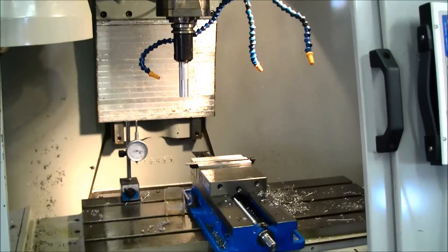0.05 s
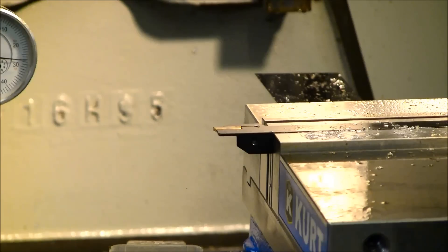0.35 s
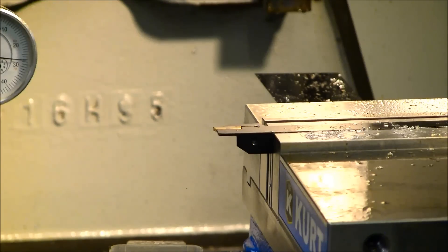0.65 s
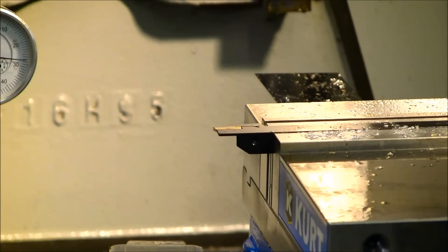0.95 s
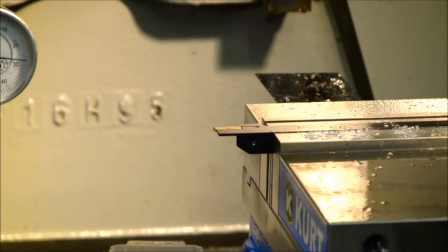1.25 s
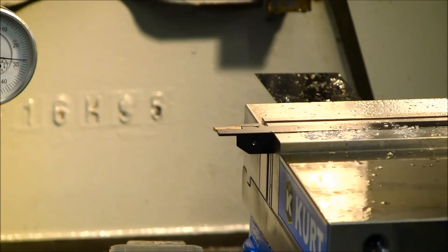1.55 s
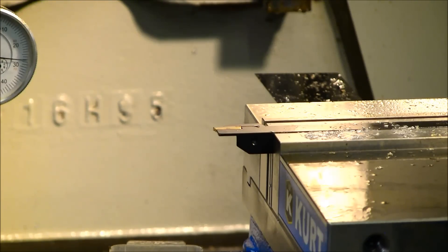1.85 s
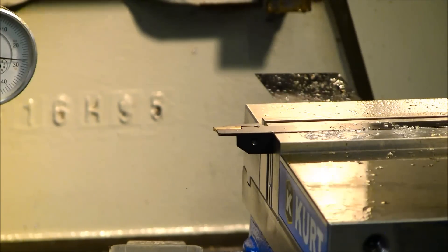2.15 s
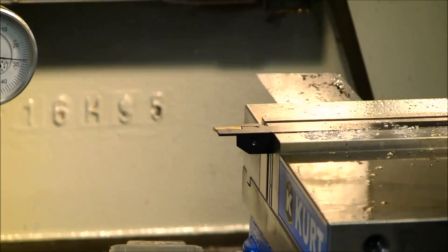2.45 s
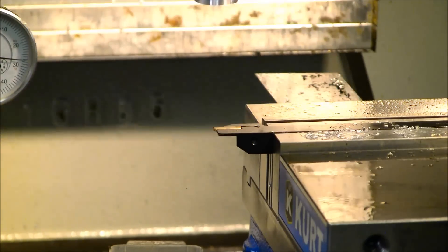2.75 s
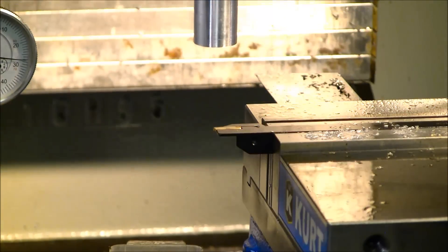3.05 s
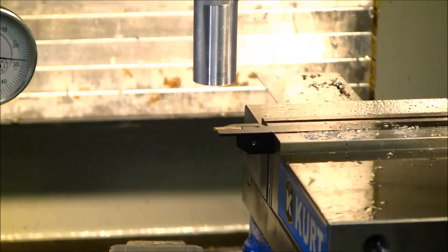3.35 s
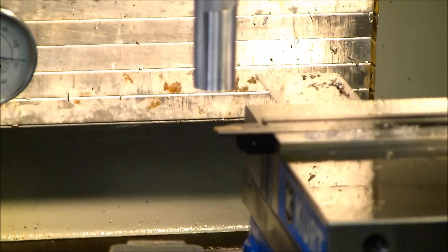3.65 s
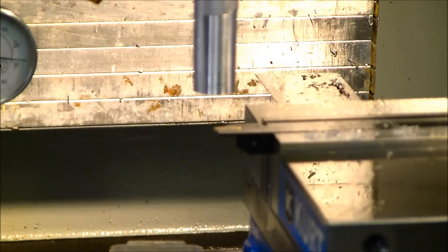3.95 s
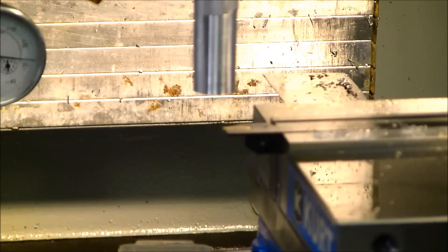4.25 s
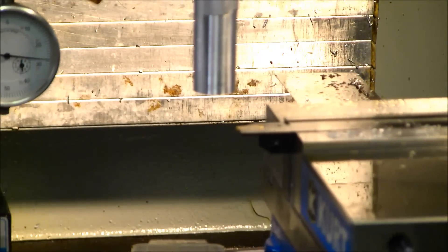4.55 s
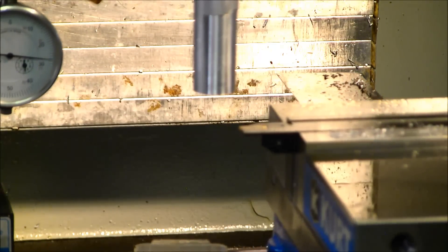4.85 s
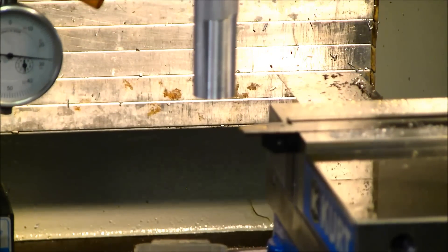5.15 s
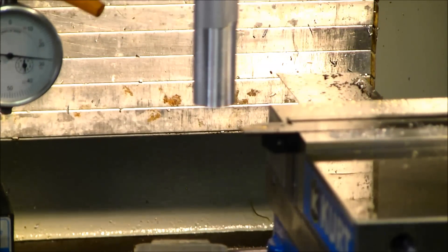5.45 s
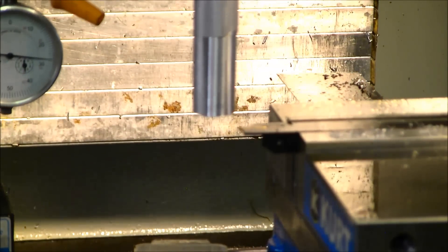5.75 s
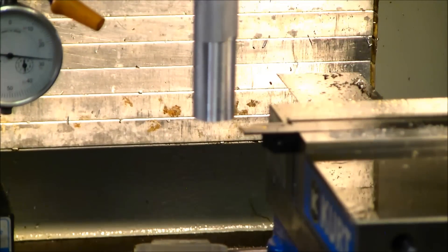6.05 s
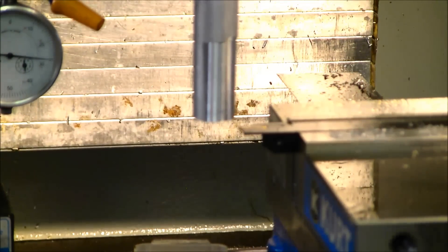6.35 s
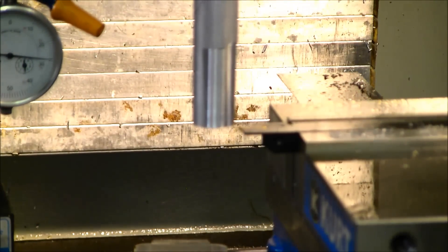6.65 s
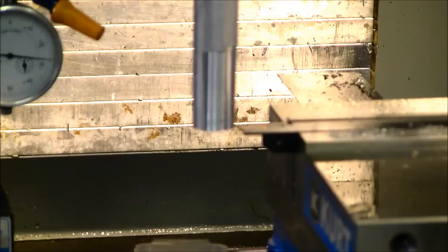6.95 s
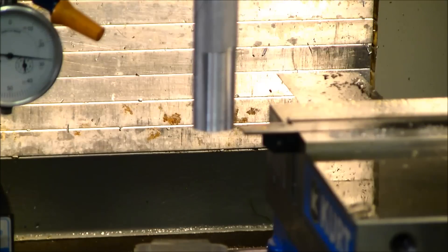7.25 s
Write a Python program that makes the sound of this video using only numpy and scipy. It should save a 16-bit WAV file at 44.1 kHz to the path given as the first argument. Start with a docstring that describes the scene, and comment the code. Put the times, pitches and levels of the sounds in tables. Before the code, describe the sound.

Light clacks, then a milling machine's drive whine, a scraping, squeaking axis move and a swelling airy rush with a rising motor whine.

```python
"""A workshop, at a milling machine in its sheet-metal cabinet. Close handling knocks and clacks of the
mechanism, then a drive spins up to a steady whine. The head runs down its axis with a rough, gliding
tone that makes the guards sing, while the ways scrape, hiss and squeak. A second motor comes up to speed
and a broad, turbulent rush swells with it, coloured by the resonances of the cabinet."""
import sys
import numpy as np
from scipy import signal
from scipy.fft import rfft, irfft, next_fast_len
from scipy.io import wavfile
from scipy.ndimage import map_coordinates

SR = 44100
rng = np.random.default_rng(int(sys.argv[2]) if len(sys.argv) > 2 else 0)


def to_wav(sig):
    """Store sig (one row per channel, or 1-D mono) as 16-bit WAV at the path in sys.argv[1].

    Samples outside -1..1 are clipped; the rate is SR.
    """
    pcm = np.clip(np.atleast_2d(sig), -1, 1) * 32767
    pcm = np.round(pcm).astype(np.int16)
    wavfile.write(sys.argv[1], SR, pcm.T)  # frames by channels


N = 322796

# rush spectrum: f/Hz, density/dB
RUSH_SPECTRUM = [(30, -43.0), (150, -42), (300, -47.5), (500, -19.5), (850, -17), (1100, -5.5), (1400, -12),
                 (1800, -3), (2300, 1), (3350, -3), (5000, -0.3), (8300, 1), (11000, -5), (15700, -9)]
def rush(split_hz=3000, flicker_db=0.38, ripple_db=1.5, ripple_step_hz=22):
    """Turbulence, louder and brighter with the second motor's speed; standing waves ripple the treble."""
    speed = motor_hz() / MOTOR_TOP_HZ
    waves_db = ripple_db * rng.standard_normal(8192)

    def ripple(hz):
        wave_db = np.interp(hz / ripple_step_hz, np.arange(len(waves_db)), waves_db)
        return undb(np.minimum(hz / split_hz, 1) * wave_db)

    air = noise(lambda hz: colour(RUSH_SPECTRUM, hz) * cabinet(hz, depth=0.93) * ripple(hz))
    low = lowpass(air, split_hz, order=2)
    body = low * undb(flicker_db * walk(22))
    treble = (air - low) * with_speed(speed, flicker_db * walk(28), db_per_doubling=8)
    gain = with_speed(speed, db=-22.5, db_per_doubling=11.5) * envelope(start_s=2.71, attack_s=0.68)
    return (body + treble) * gain


# cabinet resonances: f/Hz, width/Hz, lift/dB
CABINET_MODES = [(732, 28, 6), (765, 18, 8.5), (926, 58, 7.5), (1172, 51, 8.5), (1300, 32, 6.5),
                 (1353, 128, 15), (1439, 167, 9), (1519.6, 33, 14.5), (1593, 26.5, 10.5), (1616, 43, 7),
                 (1700, 97, 12), (1782, 43, 11.5), (1844, 45, 4.5), (1882, 51, 13), (2000, 15, 13.5),
                 (2075, 31, 7.5), (2100, 24, 0.5), (2549, 51, 8.5), (2726, 160, 5), (3000, 42, 8.5),
                 (3610, 52, 7), (3770, 46, 8.5), (4060, 61, 5), (4146, 29, 5), (4040, 210, 5),
                 (4155, 27, 10), (5470, 21, 3), (6830, 30, 6.5), (7660, 170, -5.5), (7795, 74, 7)]
def cabinet(hz, depth):
    """Gain of the sheet-metal resonances; depth scales their lift in dB."""
    return lift(CABINET_MODES, hz) ** depth


# drive partials: multiple, level/dB
DRIVE_PARTIALS = [(1, -4), (2, -17.5), (3, -11.5), (4, -25.5), (5, -18), (6, -11.5), (7, -23), (8, -19)]
# housing resonances: f/Hz, width/Hz, lift/dB
HOUSING_MODES = [(2195, 110, 9), (4150, 330, 22)]
# drive hiss spectrum: f/Hz, density/dB
DRIVE_HISS_SPECTRUM = [(40, -37), (200, -24.5), (450, -31.5), (700, -12.5), (950, -6), (1300, -2.5),
                       (1900, -0.5), (2900, 0.5), (4400, -3.5), (6500, 2.5), (9000, -3.5), (12000, -8),
                       (16000, -10)]
def drive(start_s=0.637, spinup_s=0.125, top_hz=1102, whine_db=-48.5, hiss_db=-47.5, load_db=3):
    """A drive nears top speed exponentially, hissing; its partials flare at housing resonances."""
    speed = 1 - np.exp(-np.maximum(clock() - start_s, 0) / spinup_s)
    tone_hz = top_hz * speed
    phase = turn(tone_hz * (1 + 0.00198 * walk(25)))
    whine = 0
    for k, db in DRIVE_PARTIALS:
        flutter_db = (3 if k > 1 else 0.6) * walk(18)
        whine += lift(HOUSING_MODES, k * tone_hz) * undb(db + flutter_db) * np.sin(k * phase)
    whine *= np.sqrt(2) * undb(whine_db) * speed ** 2 * envelope(start_s, attack_s=0.74)
    hiss = noise(lambda hz: colour(DRIVE_HISS_SPECTRUM, hz) * cabinet(hz, depth=0.25))
    hiss *= undb(0.35 * walk(20))
    load = envelope(*SCRAPE_S)  # while the axis travels
    return whine + hiss * with_speed(speed, hiss_db + load_db * load, db_per_doubling=26)


# axis partials: multiple, level/dB, width/Hz
AXIS_PARTIALS = [(1, -9, 150), (2, 1, 380), (3, 2, 420), (4, -2, 1200), (6, -25, 900)]
# judder at slow speed: tone f/Hz, width/Hz, lift/dB
AXIS_JUDDER = [(650, 76, 12.5)]
AXIS_FAST_HZ = 1250
TRAVEL_S = (1.985, 0.082, 3.42, 0.08)  # start, attack, end, release
def axis(flicker_db=1.6):
    """The moving axis rasps: each partial is shaken at random into a band, then rung by the cabinet."""
    tone_hz = axis_hz()
    phase, speed = turn(tone_hz), tone_hz / AXIS_FAST_HZ
    overtone_gain = with_speed(speed, db=0, db_per_doubling=28)
    tone = 0
    for k, db, width_hz in AXIS_PARTIALS:
        band = walk(width_hz) * np.sin(k * phase) + walk(width_hz) * np.cos(k * phase)
        tone += undb(db) * (overtone_gain if k > 1 else 1) * band
    n = next_fast_len(N, True)
    bin_hz = np.arange(n // 2 + 1) * SR / n
    rung = irfft(rfft(tone, n) * cabinet(bin_hz, depth=0.42), n)[:N]
    gain = with_speed(speed, db=-38, db_per_doubling=13) * lift(AXIS_JUDDER, tone_hz)
    return highpass(rung * gain * envelope(*TRAVEL_S) * undb(flicker_db * walk(44.64)), 600)


# axis tone: t/s, f/Hz
AXIS_GLIDE = [(2.028, 615), (2.12, 700), (2.18, 900), (2.26, 1078), (2.36, 1278), (2.5, 1255), (2.58, 1208),
              (2.78, 1197), (2.81, 1001), (2.99, 914), (3.06, 769), (3.199, 740), (3.26, 624), (3.42, 665)]
def axis_hz():
    """The tone follows axis speed: a fast run, then two slower steps."""
    return np.interp(clock(), *np.transpose(AXIS_GLIDE))


# body modes of ways and guards: f/Hz, width/Hz, level/dB
WAYS_MODES = [(594, 37, -3), (725, 53, -1.5), (925, 46, -7.5), (1120, 57, 2), (1410, 46, 0.5),
              (1620, 78, 7), (1856, 160, 1), (2080, 230, -3), (2500, 860, -9.5), (3030, 2100, -4)]
# friction hiss spectrum: f/Hz, density/dB
WAYS_HISS_SPECTRUM = [(200, -62), (1500, -43), (3000, -17), (4100, -2), (5250, -3.5), (6300, -0.5),
                      (7100, -5.5), (7400, -5), (8000, 1.5), (8600, -5), (9200, -2.5), (9800, -12.5),
                      (12000, -19), (16000, -20)]
# thin ringing of the ways: f/Hz, width/Hz, lift/dB
WAYS_RINGS = [(5270, 12, 14), (5950, 59, 7.5), (7150, 86, 15.5), (7640, 47, 16.5), (7910, 82, 6),
              (8510, 57, 13.5), (9150, 110, 3)]
# sizzle spectrum: f/Hz, density/dB
SIZZLE_SPECTRUM = [(300, -72), (7000, -35), (10500, -6.5), (12000, -10), (13500, -7), (15300, -2),
                   (16000, -18)]
# start, attack, end, release
CREEP_S, SCRAPE_S = (1.604, 0.087, 1.855, 0.093), (1.78, 0.34, 3.38, 0.11)
HISS_S, SIZZLE_S = (1.842, 0.011, 3.73, 0.51), (1.8, 0.28, 3.32, 0.3)
def ways(creep_scrape_db=-51.5, creep_hiss_db=-48.5):
    """Friction of the ways rings the guards, hisses and sizzles, unevenly and more with speed."""
    def modes(hz):
        powers = (undb(2 * db) / (1 + (1.48 * (hz - mode_hz) / width_hz) ** 2) ** 2
                  for mode_hz, width_hz, db in WAYS_MODES)
        return np.sqrt(sum(powers))

    scrape = highpass(noise(modes), 506)
    hiss = noise(lambda hz: colour(WAYS_HISS_SPECTRUM, hz) * lift(WAYS_RINGS, hz) * cabinet(hz, 0.22))
    sizzle = noise(lambda hz: colour(SIZZLE_SPECTRUM, hz))
    speed = axis_hz() / AXIS_FAST_HZ
    creep = envelope(*CREEP_S)  # the axis takes up its load
    scrape *= with_speed(speed, -35, 3) * envelope(*SCRAPE_S) + undb(creep_scrape_db) * creep
    hiss *= with_speed(speed, -31.5, 2.5) * envelope(*HISS_S) + undb(creep_hiss_db) * creep
    sizzle *= with_speed(speed, -39, 8) * envelope(*SIZZLE_S)
    uneven_db = 1.1 * walk(50)
    return scrape * undb(uneven_db) + hiss * undb(uneven_db / 2) + sizzle * undb(2 * walk(40))


# guard panels: f/Hz, reach/Hz, level/dB
GUARD_PANELS = [(595, 50, -40.5), (923, 34, -42), (1157, 69, -33)]
def guards(waver=0.0081, roughness=0.84):
    """Unevenly shaken panels sing while the axis tone is near their resonance; higher ones are rougher."""
    bend, shake, tone_hz = walk(260), walk(200), axis_hz()
    out = 0
    for hz, reach_hz, db in GUARD_PANELS:
        swell = np.exp(-((tone_hz - hz) / reach_hz) ** 2)
        flutter = 1 + roughness * min(hz / 2000, 1) * shake
        out += undb(db) * swell * flutter * np.sin(turn(hz * (1 + waver * bend)))
    return np.sqrt(2) * out * envelope(*TRAVEL_S)


# squeaks of ways and guards, and a midrange snap just after the clack at 1.132 s: centre t/s, f/Hz, half-
# width/Hz, level/dB, half-length/s
SQUEAKS_AND_SNAP = [(0.436, 2960, 190, -46.5, 0.032), (1.145, 3000, 900, -42.5, 0.017),
                    (1.549, 1247, 30, -51, 0.055), (1.9, 15100, 1080, -42, .03), (2.03, 2530, 140, -40, .03),
                    (2.104, 1622, 45, -37, 0.0352), (2.258, 13900, 900, -37, .035),
                    (2.308, 15300, 600, -37, .04), (2.34, 3840, 90, -33, .03), (2.57, 14400, 1112, -39, .025),
                    (2.61, 15520, 498, -38, .03), (2.699, 15100, 700, -41, .04), (2.785, 14900, 900, -41, .025),
                    (2.848, 606, 25, -41.5, .05), (3.27, 2650, 80, -31.5, .033),
                    (3.39, 2652, 79.3, -28.5, .036)]
def squeaks():
    """Narrow noise bands that swell and fade: squeaks of the ways and guards, and a midrange snap that follows
    the clack at 1.132 s."""
    out = np.zeros((2, N))
    for centre_s, centre_hz, half_hz, db, half_s in SQUEAKS_AND_SNAP:
        n = int(2 * half_s * SR)
        band = noise(lambda hz: np.exp(-((hz - centre_hz) / half_hz) ** 2), n)
        add(out, centre_s - half_s, undb(db) * np.hanning(n) * band)
    return out


# second motor partials: multiple, level/dB
MOTOR_PARTIALS = [(1, -0.5), (2, -2), (3, 1)]
# mount resonances: f/Hz, width/Hz, lift/dB
MOUNT_MODES = [(1013, 64, 11.5), (2106, 170, 14.5)]
MOTOR_TOP_HZ = 1094
def motor(wobble=0.00088, flutter_db=2):
    """The second motor whines slowly upward; its partials flare at the resonances of its mount."""
    hz = motor_hz()
    phase = turn(hz * (1 + wobble * walk(20)))
    whine = 0
    for k, db in MOTOR_PARTIALS:
        whine += lift(MOUNT_MODES, k * hz) * undb(db + flutter_db * walk(12)) * np.sin(k * phase)
    gain = with_speed(hz / MOTOR_TOP_HZ, db=-53, db_per_doubling=4)
    return np.sqrt(2) * whine * gain * envelope(start_s=3.25, attack_s=0.53)


def motor_hz(start_s=0.9, ramp_hz_per_s=312.3, knee_hz=88):
    """Tone of the second motor: a steady ramp that eases into top speed."""
    to_go_hz = MOTOR_TOP_HZ - ramp_hz_per_s * (clock() - start_s)
    return np.maximum(MOTOR_TOP_HZ - knee_hz * np.logaddexp(0, to_go_hz / knee_hz), 0)


# clacks of the mechanism: t/s, level/dB, t60/s, tilt/(dB/octave), relative ring/dB
MECHANISM_CLACKS = [(0.078, -30.5, 0.013, 1.5, -44), (0.276, -47, 0.092, 2, -30), (0.305, -45, .2, 3, -30),
                    (0.316, -40, 0.13, 0, -30), (0.340, -44.5, .3, 2, -30), (0.462, -38, 0.033, 0, -30),
                    (0.467, -27, 0.033, -0.5, -30), (0.472, -37, 0.15, 0, -22),
                    (0.585, -36, 0.27, -2.5, -30), (0.589, -21, 0.17, 6, -23), (0.610, -28, 0.16, 0, -23),
                    (0.988, -44, 0.13, -2.5, -32), (1.132, -38.5, 0.18, 2, 5)]
# clack spectrum: f/Hz, density/dB
CLACK_SPECTRUM = [(88, -69), (150, -35), (286, -40), (555, -16), (854, -15), (1120, -5), (1290, -13),
                  (1630, 0), (2100, -4.5), (3100, -0.5), (4580, -6), (10000, -7.5), (16000, -12.5)]
def clacks(rise_s=0.00075, ring_hz=11800, ring_half_width_hz=1500):
    """Sharp clacks scatter into the cabinet's dense ring; the two loudest come as quick clusters."""
    out, t = np.zeros((2, N)), np.arange(SR // 3) / SR
    for start_s, db, t60_s, tilt, ring_db in MECHANISM_CLACKS:
        body = noise(lambda hz: colour(CLACK_SPECTRUM, hz) * undb(tilt * np.log2((hz + 1) / 4000)), len(t))
        ring = noise(lambda hz: 1 / (1 + ((hz - ring_hz) / ring_half_width_hz) ** 2), len(t))
        gain = undb(db - 60 * t / t60_s) * (1 - np.exp(-t / rise_s))
        add(out, start_s, (body + undb(ring_db) * ring) * gain)
    return out


# handling knocks: t/s, level/dB, relative thud/dB
HANDLING_KNOCKS = [(0.1641, -22.5, -6.5), (0.1996, -24, -5.5)]
# ring of a handling knock: f/Hz, relative level/dB, t60/s
HANDLING_KNOCK_MODES = [(183, -21, 0.098), (657, -8.5, 0.031), (784, -16, .03), (1033, 2, 0.018),
                        (1084, 5.5, 0.018), (1780, -4, 0.016), (2210, -17, 0.012)]
# thud and rustle spectrum: f/Hz, density/dB
THUD_SPECTRUM = [(30, -32), (100, -11), (180, -7), (270, -5.5), (650, 0), (1100, 2), (1600, -19),
                 (5000, -37)]
def handling_knocks(rise_s=0.0036, thud_t60_s=0.084, snap_db=-9, snap_t60_s=0.011, rustle_db=-55):
    """Two soft handling knocks close to the microphone: snap, ring and thud; a faint rustle leads in."""
    out, t = np.zeros((2, N)), np.arange(SR // 5) / SR
    ring = sum(undb(db - 60 * t / t60_s) * np.sin(2 * np.pi * hz * t)
               for hz, db, t60_s in HANDLING_KNOCK_MODES)
    ring *= 1 - 0.93 * np.exp(-(t / rise_s) ** 2)
    ring /= np.abs(ring).max()
    snap_spectrum = [(300, -30), (1800, 9), (4000, -3), (7000, -12), (16000, -26)]  # f/Hz, density/dB
    for start_s, db, thud_db in HANDLING_KNOCKS:
        thud = np.array([undb(side_db) * noise(lambda hz: colour(THUD_SPECTRUM, hz), len(t))[0]
                         for side_db in (-7, 0)])  # left, right
        thud *= undb(thud_db - 60 * t / thud_t60_s)
        snap = noise(lambda hz: colour(snap_spectrum, hz), len(t)) * undb(snap_db - 60 * t / snap_t60_s)
        add(out, start_s, undb(db) * (ring + thud + snap))
    fade = np.interp(clock(), [0, 0.08, 0.2, 0.25], [0.56, 1, 0, 0.059])
    rustle = undb(rustle_db) * fade * noise(lambda hz: colour(THUD_SPECTRUM, hz))
    return highpass(out + rustle, 113)


# room noise spectrum: f/Hz, density/dB
ROOM_SPECTRUM = [(30, -28), (150, -29), (350, -15), (650, -14), (1300, -5), (2300, -0.5), (3000, -0.5),
                 (4500, -1.5), (6000, -5), (9000, -5.5), (16000, -13)]
def workshop(room_db=-53.5, fan_hz=486, fan_db=-79.5, open_s=0.27, early_treble_db=-5):
    """Quiet room noise and a faint fan tone; the treble opens just after the knocks."""
    room = undb(room_db) * noise(lambda hz: colour(ROOM_SPECTRUM, hz))
    low = lowpass(room, 2500, order=1)
    treble_db = early_treble_db * np.clip((open_s - clock()) / 0.04, 0, 1)
    fan = undb(fan_db) * np.sqrt(2) * np.sin(2 * np.pi * fan_hz * clock())
    return low + (room - low) * undb(treble_db) + fan


# stereo width: f/Hz, side minus mid/dB
STEREO_WIDTH = [(100, -33), (700, -32), (1300, -13), (2400, -11), (4400, -8.5), (15000, -9.5)]
def noise(gain, size=N):
    """Stereo noise of rms 1 with spectrum gain(hz); narrow in the bass, wider in the treble."""
    n = next_fast_len(size, True)
    hz = np.arange(n // 2 + 1) * SR / n
    mid, side = rfft(rng.standard_normal((2, n)))
    side *= colour(STEREO_WIDTH, hz)
    stereo = irfft(np.array([mid + side, mid - side]) * gain(hz), n)[:, :size]
    return stereo / np.sqrt(np.mean(stereo ** 2))


def colour(points, hz):
    """Gain at hz of a spectrum (f/Hz, level/dB)."""
    point_hz, db = np.transpose(points)
    return undb(np.interp(np.log(hz + 1), np.log(point_hz), db))


def lift(peaks, hz):
    """Gain at hz of a set of resonances."""
    return undb(sum(db / (1 + (2 * (hz - peak_hz) / width_hz) ** 2) for peak_hz, width_hz, db in peaks))


def with_speed(speed, db, db_per_doubling):
    """Gain as a power of speed, db at speed 1."""
    return undb(db + db_per_doubling * np.log2(np.maximum(speed, 1e-3)))


def envelope(start_s, attack_s, end_s=np.inf, release_s=1):
    """Linear rise, hold at 1, linear fall from end_s."""
    t = clock()
    return np.clip((t - start_s) / attack_s, 0, 1) * np.clip(1 - (t - end_s) / release_s, 0, 1)


def walk(rate_hz):
    """Smooth random wander of spread 1."""
    return 1.14 * map_coordinates(rng.standard_normal(8192), [clock() * rate_hz], order=2, mode="wrap")


def turn(hz):
    """Phase/rad of a rotation at hz."""
    return 2 * np.pi * np.cumsum(hz) / SR


def highpass(x, hz):
    """Third-order bass cut."""
    return signal.sosfilt(signal.butter(3, hz, "high", fs=SR, output="sos"), x)


def lowpass(x, hz, order):
    """Zero-phase low band."""
    return signal.sosfiltfilt(signal.butter(order, hz, fs=SR, output="sos"), x)


def add(out, start_s, sound):
    """Mix a sound in at start_s."""
    i = max(int(start_s * SR), 0)
    out[:, i:i + sound.shape[-1]] += sound[..., :N - i]


def undb(db):
    """Decibels to gain."""
    return 10 ** (np.asarray(db) / 20)


def clock():
    """Sample times/s."""
    return np.arange(N) / SR


def scene(right_lead_db=0.87):
    """Handling knocks and the machine, a little to the right, over the room noise."""
    handling = handling_knocks()
    machine = clacks() + drive() + motor() + axis() + guards() + ways() + squeaks() + rush()
    pan = undb(np.array([[-right_lead_db], [right_lead_db]]) / 2)
    return (handling + machine) * pan + workshop()


def record(dry, top_hz=15950):
    """Steep low-pass at top_hz."""
    return signal.sosfilt(signal.ellip(12, 0.2, 70, top_hz, fs=SR, output="sos"), dry)


dry = scene()
out = record(dry)
to_wav(out)
```